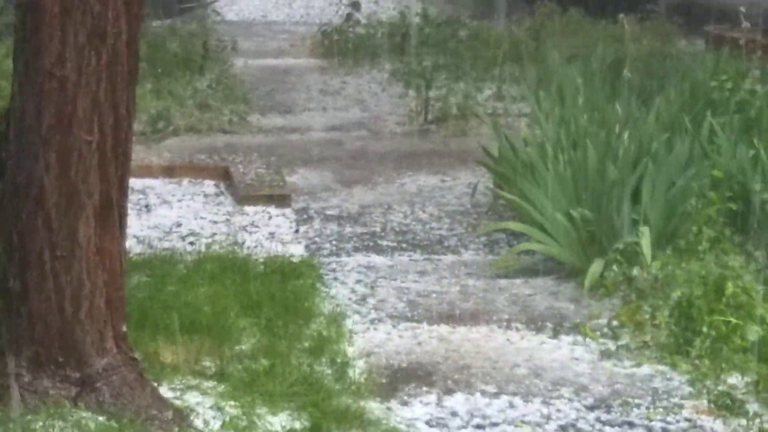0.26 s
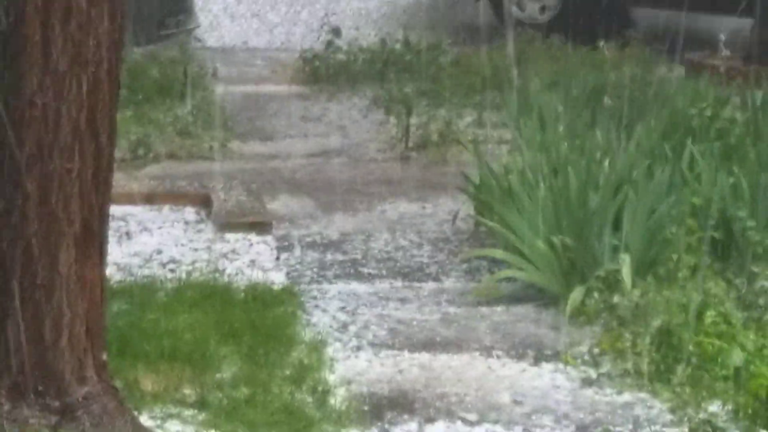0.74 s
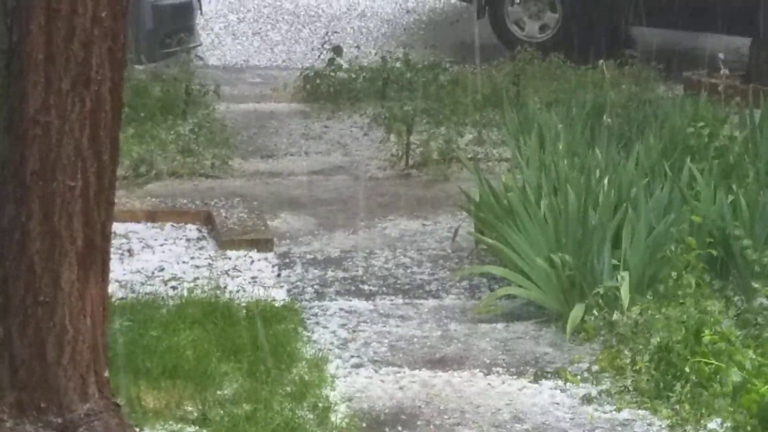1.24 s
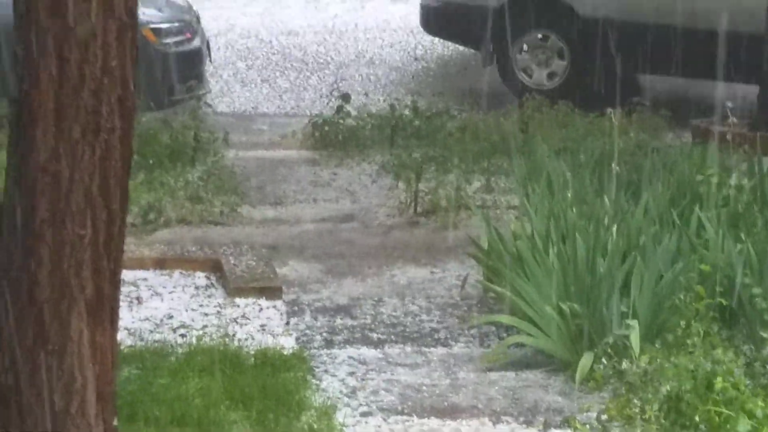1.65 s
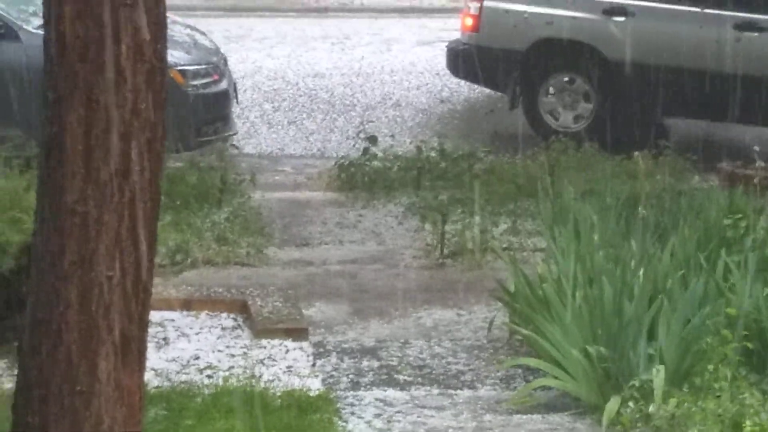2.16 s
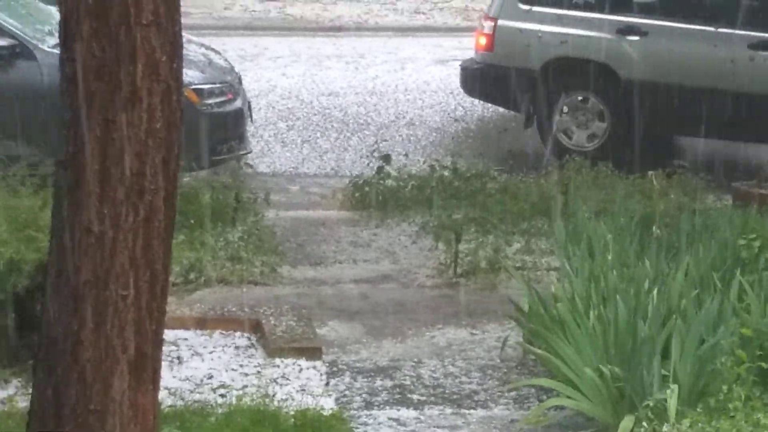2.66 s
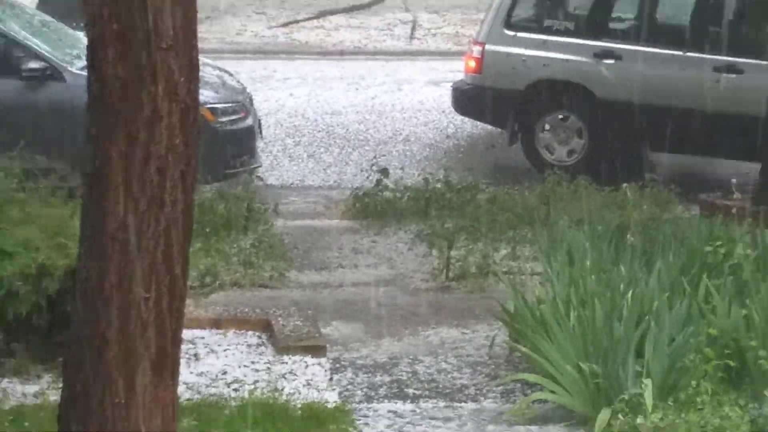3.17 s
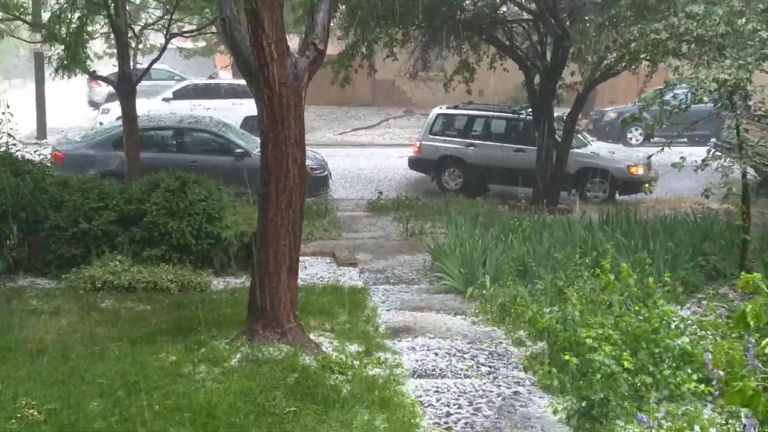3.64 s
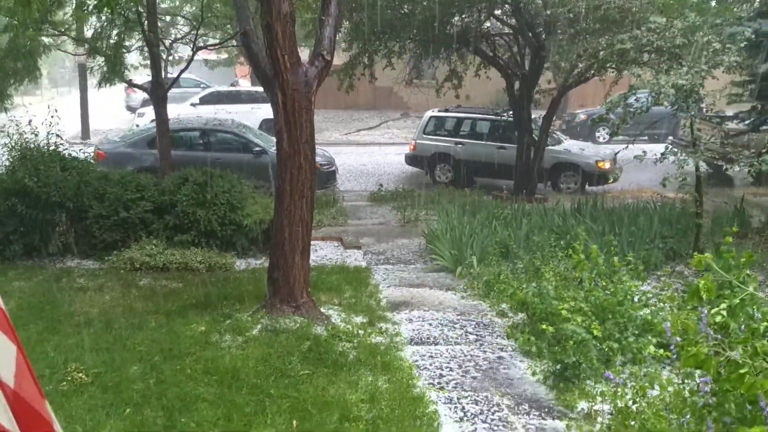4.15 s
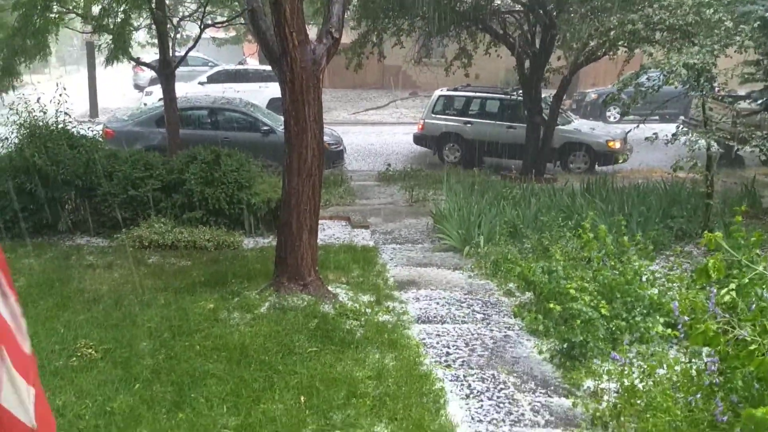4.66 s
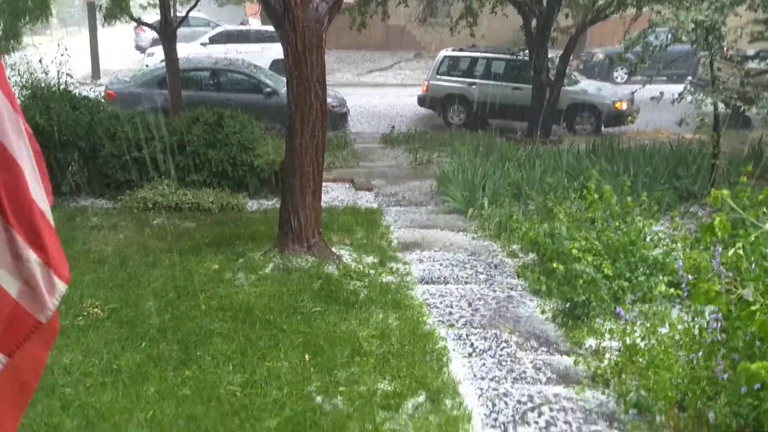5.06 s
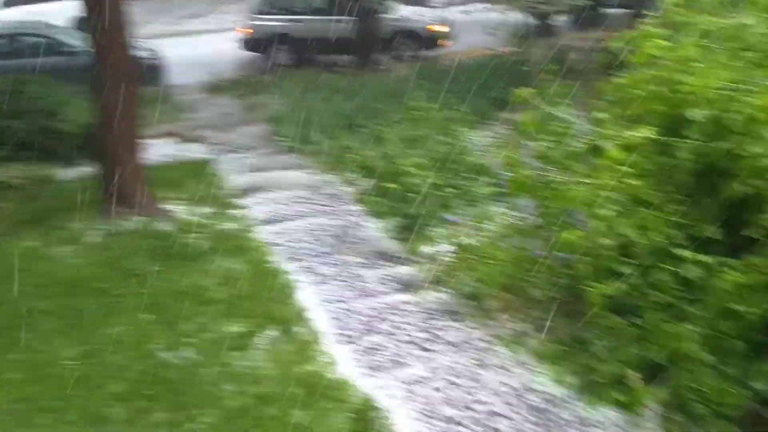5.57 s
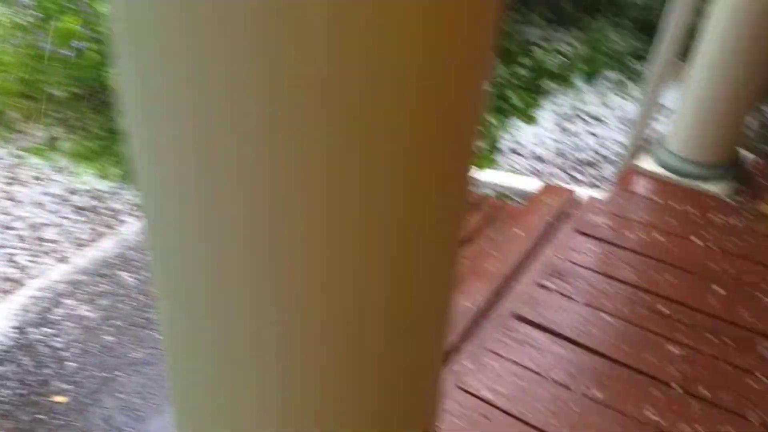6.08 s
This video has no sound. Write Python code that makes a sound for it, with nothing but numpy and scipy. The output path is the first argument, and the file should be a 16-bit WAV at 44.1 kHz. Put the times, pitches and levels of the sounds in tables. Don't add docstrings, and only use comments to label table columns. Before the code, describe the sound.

From a covered porch, a phone picks up a steady downpour with hail: a wide grainy hiss, mid-low drumming on roof boards, and quick gusty swells. Isolated stones click around the listener, the clearest around one second, near three and three-quarters, and a hard crack just before the end. Small bright splashes dot the hiss. After loud strikes the level dips slightly and recovers. The deck's woody patter strengthens in the last two seconds.

```python
import sys
import numpy as np
from scipy import signal
from scipy.fft import rfft, irfft, next_fast_len
from scipy.io import wavfile
from scipy.ndimage import uniform_filter1d, map_coordinates

SR = 44100
rng = np.random.default_rng(int(sys.argv[2]) if len(sys.argv) > 2 else 0)


def generate_wav(sig):
    pcm = np.round(np.clip(np.atleast_2d(sig).T, -1, 1) * 32767).astype(np.int16)
    wavfile.write(sys.argv[1], SR, pcm)


def nominal_scale(level):
    x = np.asarray(level, float) / 20
    return 10 ** x


N = 278446
APART = 0.00045


def unit(x):
    return x / np.sqrt(np.mean(x ** 2) + 1e-20)


def along(points, hz):
    f, v = np.transpose(points)
    return np.interp(np.log(hz + 1), np.log(f + 1), v)


def wobble(rate):
    knots = rng.standard_normal(int(N * rate / SR) + 4)
    return map_coordinates(knots, [np.arange(N) * rate / SR])


def filtered(x, response):
    m = next_fast_len(N + SR // 4)
    return irfft(rfft(x, m) * response(np.fft.rfftfreq(m, 1 / SR)), m)[..., :N]


def diffuse(spectrum, patchy_db):
    # [f/Hz, share]
    shadow = [(60, 0.98), (200, 1), (350, 0.88), (600, 0.97), (1000, .97), (2000, 0.41)]
    z = signal.stft(rng.standard_normal((2, N)), nperseg=256)[2]
    patches = rng.standard_normal(z.shape[1:])
    patches = uniform_filter1d(patches, size=8, axis=0)
    patches = uniform_filter1d(patches, size=10, axis=1)
    pair = signal.istft(z * nominal_scale(patchy_db * unit(patches)), nperseg=256)[1][:, :N]

    def mix(hz):
        likeness = along(shadow, hz) * np.sinc(2 * hz * APART)
        angle = np.arccos(np.clip(likeness, -1, 1)) / 2
        return nominal_scale(along(spectrum, hz)) * [np.cos(angle), np.sin(angle)]

    both, differ = filtered(pair, mix)
    return unit(np.array([both + differ, both - differ]))


def ticks(s, size, hz, cycles, side, count):
    out = []
    for port in (1, -1):
        arrive = (s + port * side * APART / 2) * SR
        at = np.ceil(arrive)[:, None] + np.arange(count)
        turns = (at - arrive[:, None]) / SR * hz[:, None]
        near = nominal_scale(-2.5 * port * side)
        ring = (size * near)[:, None] * np.sin(2 * np.pi * turns)
        ring = ring * np.exp(-turns * 2 / cycles[:, None])
        ring = ring * np.minimum(turns * 2, 1)
        place = np.clip(at, 0, N).astype(int)
        out.append(np.bincount(place.ravel(), ring.ravel(), N + 1)[:N])
    return np.array(out)


def patter(count, hz, octaves, cycles, spread_db, size):
    when, side, e = rng.random((count, 3)).T
    pitch = np.clip(hz * 2 ** (octaves * rng.standard_normal(count)), 100, SR / 3)
    blow = nominal_scale(-spread_db * np.log(1 - .995 * e)) * rng.choice([-1, 1], count)
    return unit(ticks(when * N / SR, blow, pitch, np.full(count, cycles), 2 * side - 1, count=size))


def flurry_swell():
    # [t/s, swell/dB]
    flurries = [(.1, 1), (.36, -0.6), (.93, 1.5), (1.08, 1.5), (1.75, -1), (2.25, 1), (2.58, 1),
                (3.27, 0.9), (3.69, 1.5), (4.2, 0.5), (5.02, 1.5), (5.7, 2), (6.27, 2)]
    rise_s, fall_s = 0.047, 0.063
    t = np.arange(N) / SR
    return sum(db * np.exp(-((t - s) / np.where(t < s, rise_s, fall_s)) ** 2) for s, db in flurries)


def phone_turn():
    # [t/s, level/dB]
    swing = [
        (0, -22),
        (3.5, -31.5),
        (4.5, -6.5),
        (5.5, -5),
        (6.31, -3),
    ]
    return np.interp(np.arange(N) / SR, *np.transpose(swing))


def rumble_roll():
    # [t/s, level/dB]
    roll = [(0, -26.5), (.2, -29.5), (.7, -30.5), (1.0, -32.5), (1.8, -29), (1.95, -34), (3.1, -32.5),
            (3.9, -33.5), (4.7, -34.5), (5.0, -31), (5.7, -34), (6.31, -33.5)]
    return np.interp(np.arange(N) / SR, *np.transpose(roll))


def ground_hiss(flurry_db, gust_db, turn_db):
    # [f/Hz, level/dB per Hz]
    spectrum = [(900, -40), (1500, -3.5), (2400, -3), (3300, -3), (4500, -5.5), (6500, -7.5), (10000, -13),
                (13000, -20.5), (15300, -37)]
    shelter = 0.032
    hail = patter(count=14000, hz=4230, octaves=1.0, cycles=1.2, spread_db=2.5, size=40)
    hiss = diffuse(spectrum, patchy_db=1.0) + nominal_scale(-9.0) * hail
    return nominal_scale(-22 + flurry_db + gust_db - shelter * (turn_db - turn_db[0])) * hiss


def porch_drumming(flurry_db, gust_db, turn_db, roll_db):
    # [f/Hz, level/dB per Hz]
    roof_spectrum = [(200, -44), (330, -1.5), (480, -2.5), (650, 3), (850, 0), (1150, -1), (1600, -6),
                     (2600, -14.5)]
    # [f/Hz, level/dB per Hz]
    deck_spectrum = [(500, -18.5), (750, 6), (870, 7), (1000, 1.5), (1400, 3.5), (2000, -13.5)]
    roll_share = 0.26
    knocks = patter(count=2500, hz=750, octaves=0.63, cycles=2.5, spread_db=2.0, size=256)
    roof = diffuse(roof_spectrum, patchy_db=0.46) + nominal_scale(-10.5) * knocks
    deck = nominal_scale(turn_db) * diffuse(deck_spectrum, patchy_db=4.5)
    swell_db = flurry_db + roll_share * (roll_db - roll_db.mean()) + 0.4 * gust_db
    return nominal_scale(-25 + swell_db) * (roof + deck)


def far_rumble(roll_db):
    # [f/Hz, level/dB per Hz]
    spectrum = [(70, -13), (115, -4), (160, -2.5), (205, 0), (250, -4), (300, -3.5), (450, -34.5)]
    return nominal_scale(roll_db + 0.32 * wobble(7.2)) * diffuse(spectrum, patchy_db=0.14)


def street_drone():
    # [f/Hz, level/dB per Hz]
    spectrum = [(20, -30), (40, -23), (60, -5.5), (90, 6), (130, -9), (200, -19)]
    return nominal_scale(-36.5) * diffuse(spectrum, patchy_db=-0.4)


def splashes():
    # [t/s, rms level/dB]
    bursts = [(.007, -42), (.177, -29), (.356, -22), (.574, -26), (.9032, -14.5), (1.952, -28),
              (2.248, -20), (3.375, -23), (3.705, -22), (4.8, -19), (5.147, -25), (5.571, -28),
              (6.276, -29), (6.306, -29)]
    # [f/Hz, level/dB per Hz]
    spray = [(3500, -23), (6000, -13), (8500, 2), (11000, -4), (15000, -10)]
    s, db = np.transpose(bursts)
    when, e = rng.random((400, 2)).T
    s = np.r_[s, when * N / SR]
    db = np.r_[db, -38 - 2.5 * np.log(1 - .98 * e)]
    starts = np.bincount(np.minimum(s * SR, N - 1).astype(int), nominal_scale(db), N)
    fade = nominal_scale(-60 * np.arange(SR // 20) / SR / 0.018)
    envelope = signal.fftconvolve(starts, fade)[:N]
    return envelope * diffuse(spray, patchy_db=-1.0) * nominal_scale([[-1.5], [1.5]])


def stones():
    # [t/s, peak level/dB, f/Hz, ring/cycles, side -1 left to 1 right]
    close = [(.052, -18, 3000, 1.5, 0.38), (.575, -11, 3000, 1.5, 0.6), (1.0803, -1, 4000, 3.2, 0.67),
             (1.428, -7, 3500, 2.5, 0.04), (1.838, -13, 2500, 1.2, -.6), (1.8435, -14, 2500, 1.2, -.6),
             (2.573, -12, 2200, 1.2, .7), (3.216, -23, 392, 20, 0.74), (3.724, -2, 3000, 1.5, .3),
             (5.148, -6, 4000, 2.9, 0.6), (6.209, -13, 1300, 3, 0), (6.218, -10.5, 750, 3.6, 0),
             (6.2205, -8, 1200, 2.2, 0), (6.301, -10, 2000, 1.5, 0.071)]
    beside = [
        (5.71981, 2, 3900, 2.2, 0),
    ]

    def strike(table):
        s, db, hz, cycles, side = np.transpose(table)
        return ticks(s, nominal_scale(db), hz, cycles, side, count=2000)

    return strike(close) + strike(beside) * nominal_scale([[0], [-18]])


def scene():
    flurry_db, turn_db, roll_db = flurry_swell(), phone_turn(), rumble_roll()
    gust_db = .3 * wobble(12) + .4 * wobble(28)
    storm = ground_hiss(flurry_db, gust_db, turn_db)
    storm = storm + porch_drumming(flurry_db, gust_db, turn_db, roll_db)
    storm = storm + far_rumble(roll_db) + street_drone()
    return storm + splashes() + stones()


def beams(ports):
    # [f/Hz, further lag/rad, share]
    subtracted = [(300, 0.083, 0.74), (1200, 0.3, 0.69), (2700, 0.18, 0.86), (3500, 0.79, 0.89),
                  (4400, 0.15, 0.79), (5900, 0.46, 0.66), (7100, 0.67, 0.54), (8400, 0.55, 0.46),
                  (9600, .27, 0.4), (10800, 0.17, 0.32), (12000, 0.29, 0.59), (13200, .25, 0.51),
                  (14400, 0.15, 0.37)]
    # [f/Hz, level/dB]
    right_over_left = [(60, .8), (130, -1.5), (200, -2), (500, -.8), (1000, .7), (4000, .3), (6500, 1.8),
                       (9000, 2.3), (15000, 3)]
    delay_s, top_hz = 1 / 2400, 15480
    corner, lag, share = np.transpose(subtracted)

    def cross(hz):
        phase = 2 * np.pi * hz * delay_s + np.interp(hz, corner, lag)
        return np.interp(hz, corner, share) * np.exp(-1j * phase)

    def evening(hz):
        other = cross(hz)
        power = 1 + abs(other) ** 2 - 2 * np.sinc(2 * hz * APART) * other.real + 0.015
        tilt = nominal_scale(along(right_over_left, hz) * [[-.5], [.5]])
        band = (hz < top_hz) / np.sqrt(1 + (52 / (hz + 1)) ** 8)
        return tilt / np.sqrt(power) * band

    sway = 0.095 * wobble(9)
    swapped = ports[::-1]
    pair = ports - np.cos(sway) * filtered(swapped, cross)
    pair = pair - np.sin(sway) * filtered(swapped, lambda hz: 1j * cross(hz))
    return filtered(pair, evening)


def ducking():
    # [t/s, level/dB, hold/s]
    ducks = [
        (.195, -0.5, .04),
        (.749, -2, 0.078),
        (1.195, 0, .03),
        (1.85, -2, 0.075),
        (2.416, 0, .03),
        (3.4, -2, 0.043),
        (3.715, -1.5, 0.14),
        (5.046, -1.4, .05),
        (5.72, -3, 0.14),
    ]
    fall_s, recover_s = .008, 0.066
    t = np.arange(N) / SR
    dip = 0
    for s, db, hold in ducks:
        back = np.exp(-np.maximum(t - s - hold, 0) / recover_s)
        dip = dip + db * np.clip((t - s) / fall_s, 0, 1) * back
    return nominal_scale(dip)


def band_limit(x):
    return signal.sosfilt(signal.butter(12, 15690, fs=SR, output="sos"), x)


def record(dry):
    mix = beams(dry) * ducking()
    return band_limit(mix)


dry = scene()
out = record(dry)
generate_wav(out)
```